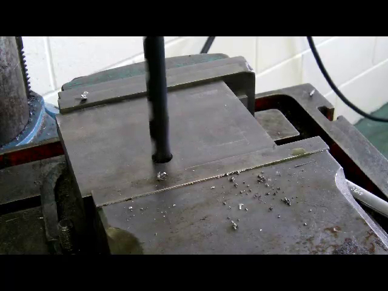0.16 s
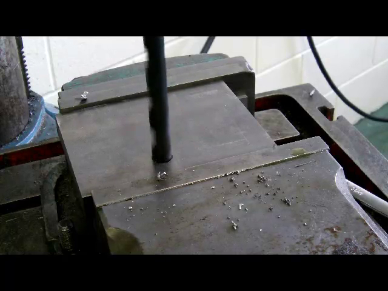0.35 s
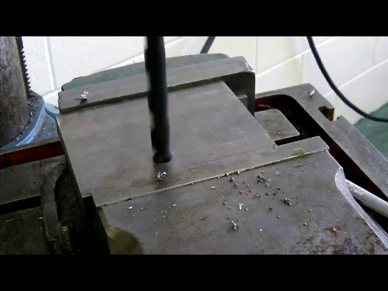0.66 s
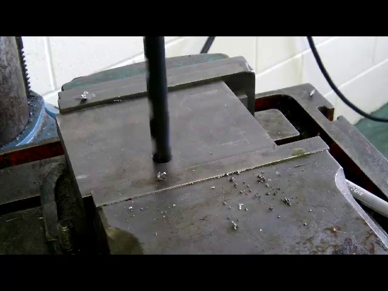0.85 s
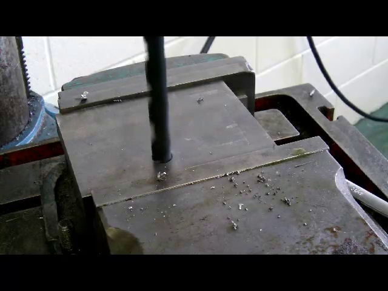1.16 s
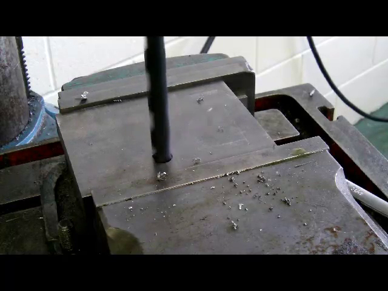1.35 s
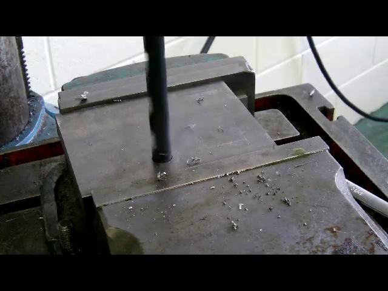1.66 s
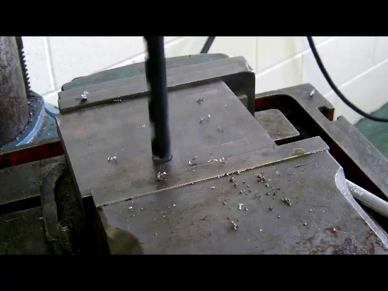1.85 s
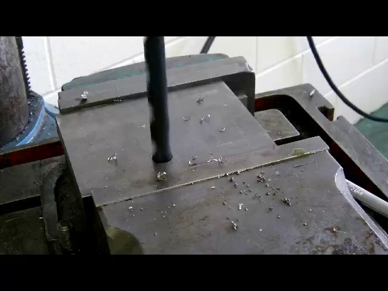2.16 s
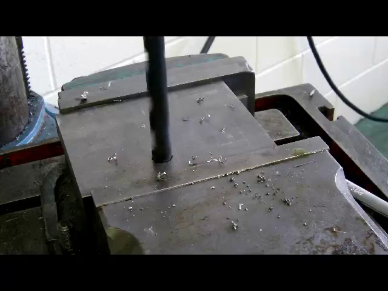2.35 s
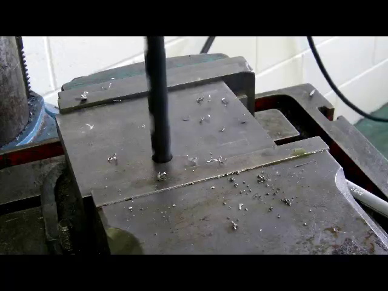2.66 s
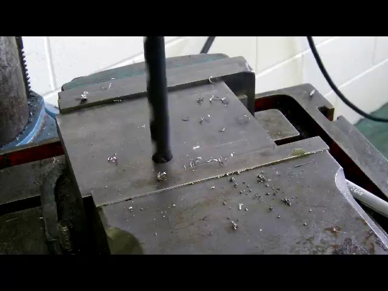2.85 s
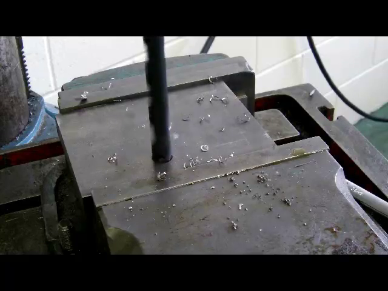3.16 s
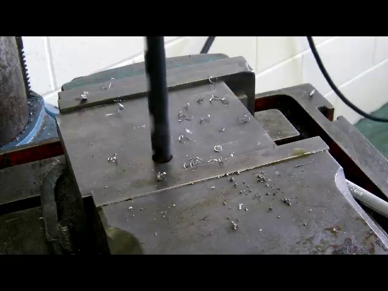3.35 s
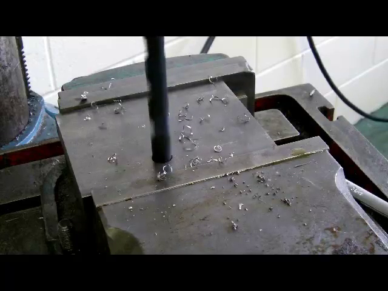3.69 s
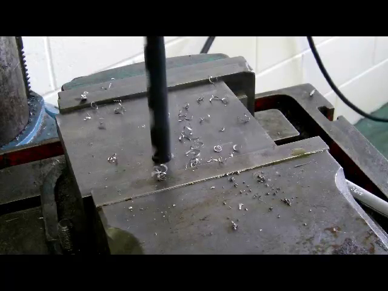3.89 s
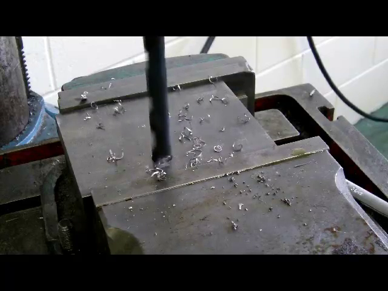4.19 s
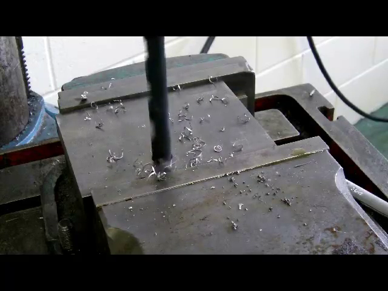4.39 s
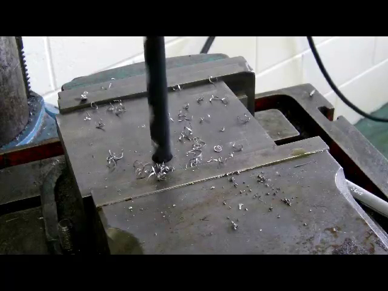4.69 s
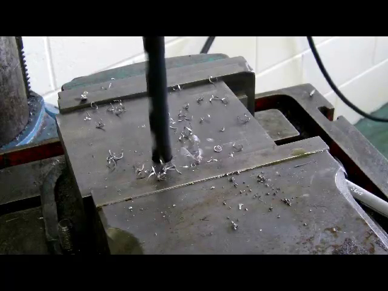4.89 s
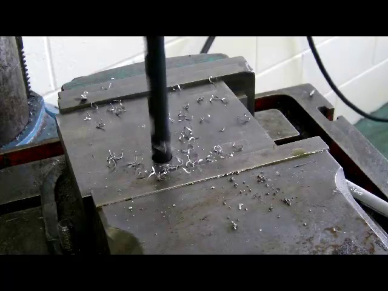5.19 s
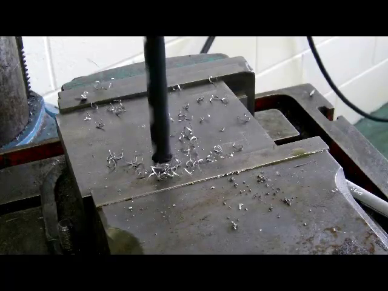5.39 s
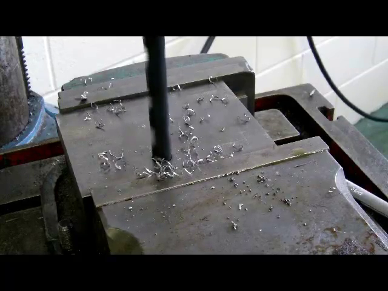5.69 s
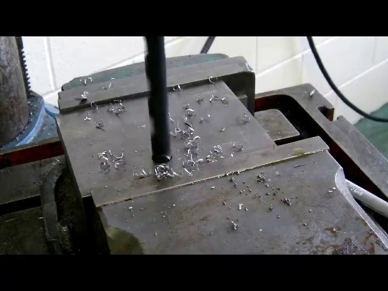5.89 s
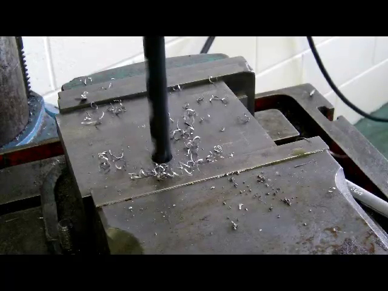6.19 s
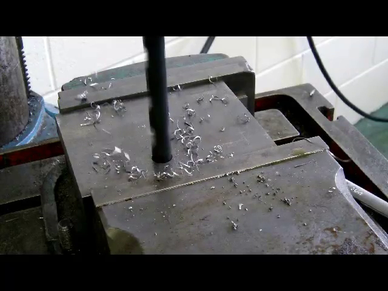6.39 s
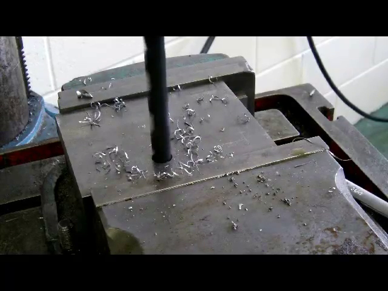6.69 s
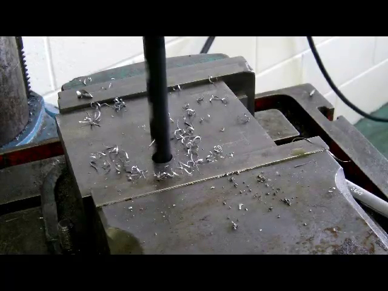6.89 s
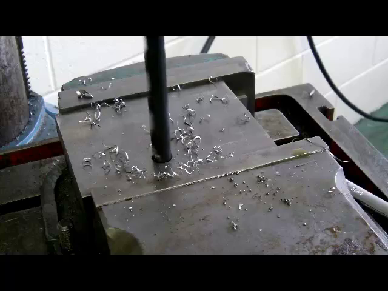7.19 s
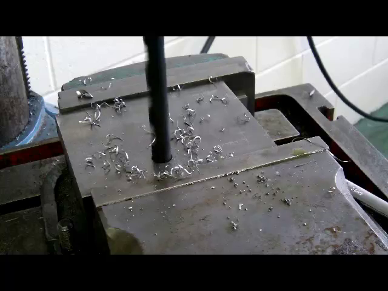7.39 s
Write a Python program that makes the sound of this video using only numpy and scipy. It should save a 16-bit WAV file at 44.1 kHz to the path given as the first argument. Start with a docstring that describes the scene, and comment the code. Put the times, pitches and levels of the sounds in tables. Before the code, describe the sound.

Heard close in a small hard-walled workshop, a drill press hums and rattles. The bit bites into steel with a harsh, crackling crunch and bright hiss, digging in unevenly for several seconds. The cut then evens out, chips tick onto the plate, and the flutes chirp rapidly with small squeaks. One sharp squeak and click near the end is followed by quieter motor whine.

```python
"""Workshop: a drill press bores a steel plate, heard close up. The drive is a set of spindle-locked tones and
a rattle that partly repeats each turn; its pitch sags under the feed. The two lips dig in and snap off chips, made
as shaped noise and ringing modes, then cut more evenly while the flutes rub and chirp in the hole as narrow noise.
The bit sticks and squeaks in brief tones, once sharply with a click. Chips land, walls echo, and a low rumble
of shaped noise follows the steady chip hiss."""
import sys
import numpy as np
from scipy import signal
from scipy.fft import rfft, irfft, next_fast_len
from scipy.io import wavfile
from scipy.ndimage import uniform_filter1d, map_coordinates

SR = 44100
rng = np.random.default_rng(int(sys.argv[2]) if len(sys.argv) > 2 else 0)


def wav_out(sig):
    """Save sig, one row per channel (or a flat mono array), as 16-bit PCM at SR to the path in sys.argv[1]."""
    wavfile.write(sys.argv[1], SR, np.round(np.clip(np.atleast_2d(sig).T, -1, 1) * 32767).astype(np.int16))


N = 332734
TOP_HZ = 11050  # upper band limit

# Feed pressure. Each row: time in seconds, pressure 0-1.
FEED = [(0, 0.04), (.35, 0.02), (1, 0.3), (2.3, .47), (3, 0.64), (4.3, 1), (6.3, 0.91), (6.5, 0.03),
        (7.54, 0.04)]
# Drive tones. Each row: cycles per spindle turn (rounded when used), level in dB against the whine level,
# gain in dB at full feed.
DRIVE_TONES = [(34, -13.5, 4.5), (38, -39, 8), (45, -23.5, -2.5), (52, -17, 8), (54, -13, -6),
               (70.07, -16.5, 0), (71.36, -7, -7.5), (74.52, 2, 0.5), (81.9, -17, -17), (85.8, -11, -5),
               (88.6, -9, -6), (117, -3.5, -19), (119.6, -11, -9), (119.7, -14, -6), (126.1, -18, -4),
               (135.8, -12, 1), (167.2, -15, 2.5), (176, -20, 2.5), (195, -31, -4), (232.8, -11.5, -1)]
# Spectrum of the drive housing. Each row: frequency in Hz, relative density in dB per Hz.
HOUSING = [(150, -22.5), (215, -16), (290, -5), (350, -12), (430, -11.5), (540, 2.5), (630, -6.5),
           (760, 5.5), (1050, 0.5), (1300, 4.5), (2250, -1), (2800, -12), (6500, -22), (11000, -40)]
# Ringing of guard and head. Each row: frequency in Hz, width in Hz, relative level in dB.
GUARD_MODES = [(346.8, 13.4, 11), (532, 8.5, 7), (750, 20, 4), (860, 69, 0.5), (1173, 7.3, 7.5),
               (1353, 50, 12.5), (1640, 37, -23), (2290, 7, 4)]
# Steady cut: point enters, lips settle in, feed is eased. Each row: time in seconds, grinding level in dB,
# chip hiss level in dB, both before digs, lulls and trims.
CUT = [(0, -59, -72), (.24, -42, -50), (.35, -29.5, -37.5), (.6, -30, -30), (.68, -26.5, -27),
       (.9, -24.5, -20.5), (1.24, -23.5, -20.5), (1.52, -25, -29.5), (2.15, -26.5, -30), (2.7, -28.5, -31),
       (3.75, -31.5, -28), (4.9, -32, -34.5), (6.33, -33, -36), (6.52, -41.5, -47), (6.9, -41.5, -50),
       (7.42, -40, -49), (7.54, -38, -33.5)]
# The bit digs in. Each row: start in seconds, length in seconds, grinding gain in dB, hiss gain in dB.
DIGS = [(1.08, 0.34, 3.5, 2), (1.58, .095, 4, 2.5), (1.692, 0.38, 7.5, 9), (2.13, .045, 3, 5),
        (2.255, 0.24, 10.5, 10), (2.789, 0.18, 7, 5.5), (3.27, 0.12, 4.5, 2.5)]
# Wandering spot where the lips bite hardest. Each row: time in seconds, lag in half turns.
BITE_LAG = [(.25, 1.5), (.55, 1.08), (.9, 1.06), (1.22, .9), (1.48, .56), (1.72, .78), (1.92, .3),
            (2.3, .3), (2.55, .52), (2.95, 1.05), (3.45, 1.2), (3.7, .97)]
# Spectrum of grinding. Each row: frequency in Hz, relative density in dB per Hz.
GRIND = [(200, -49), (450, -35), (700, -7), (1100, -7.5), (1700, -8.5), (2500, -4.5), (3600, -1.5),
         (5000, -3.5), (7000, -5.5), (10000, -12.5)]
# Spectrum of tearing chips. Each row: frequency in Hz, relative density in dB per Hz.
CHIP = [(100, -22), (300, -17), (700, -17), (2000, -10.5), (4500, -7), (6500, -1.5), (8000, -1.5),
        (9500, -1), (11000, -11.5)]
# Modes of plate, vice and bit. Each row: frequency in Hz, width in Hz, relative level in dB.
STEEL_MODES = [(840, 105, 2.5), (947, 50, 4.5), (1425, 100, 0), (1670, 35, 5), (1782, 60, 3), (2142, 69, 1),
               (2390, 81, 3.5), (2690, 61, 2.5), (3142, 154, 3), (3830, 110, -2), (4123, 126, 0),
               (4790, 66, -2.5), (6300, 146, -2), (7740, 110, 0), (9430, 110, -2)]
# Loudest chips breaking. Each row: start in seconds, level in dB, hold in seconds.
SNAPS = [(0.28, -14.5, 0.0014), (0.3705, -11, 0.00067), (.5025, -12.5, .0016), (0.545, -16.5, .0025),
         (.556, -16.5, .0023), (.573, -14, .001), (.645, -13, 0.0068), (0.676, -10, .001),
         (0.741, -13, 0.0015), (.808, -14.5, .008), (0.833, -7.5, .0018), (0.857, -12, 0.0051),
         (.901, -10.5, 0.0055), (0.928, -10, .0014), (.952, -9.5, 0.0062), (0.975, -16, 0.0018),
         (1.022, -9, 0.0022), (1.035, -12, 0.015), (1.136, -12, 0.011), (1.188, -12, 0.014),
         (1.696, -15, 0.02), (1.751, -13, 0.012), (1.819, -10, .002), (1.922, -18, 0.0069),
         (2.074, -13, 0.0034), (2.128, -9.5, 0.0011), (2.284, -8.5, .004), (2.33, -13, .003),
         (2.36, -10, 0.005), (2.484, -11, 0.0064), (2.531, -12, .007), (2.638, -13.5, .004),
         (2.74, -10.5, 0.0021), (2.748, -11.5, 0.01), (2.785, -12, .0025), (2.804, -14.5, 0.02),
         (2.85, -13, 0.0041), (2.922, -13, 0.015), (2.97, -12.5, .003), (3.001, -11.5, 0.0059),
         (3.023, -13, .003), (3.108, -14, 0.0036), (3.169, -11, 0.0027), (3.279, -10.5, 0.0068),
         (3.296, -14, .002), (3.31, -15.5, .004), (3.356, -13.5, 0.021), (3.485, -17.5, .01),
         (3.529, -14.5, .0012), (3.622, -14.5, .001), (3.66, -14, .0028), (3.716, -11.5, .0016),
         (3.763, -11, .0015), (3.772, -15, 0.022), (3.838, -11.5, 0.004), (4.023, -18, 0.0068),
         (4.112, -12.5, 0.0037), (4.244, -15, 0.0031), (4.364, -14, .0015), (4.576, -14, 0.0022),
         (4.768, -15, .004), (4.9057, -11.5, 0.0025), (5.192, -16.5, 0.0027), (5.892, -15, .0006),
         (6.3655, -14, 0.0022), (6.478, -14, 0.0015), (6.82, -21, 0.0011)]
# Chips landing on the plate. Each row: start in seconds, ring level in dB.
LANDINGS = [(3.602, -23), (3.762, -34), (3.785, -23), (4.024, -22), (4.104, -24), (4.17, -26),
            (4.301, -21.5), (4.545, -26), (4.632, -20), (4.768, -28), (4.907, -20), (5.04, -30),
            (5.192, -22), (5.378, -29)]
# Flutes rubbing in the hole. Each row: time in seconds, centre pitch in Hz, level in dB before the trim.
RUB = [(2.8, 7670, -50), (3.7, 7770, -37), (4.45, 8120, -27.5), (4.95, 7815, -25), (5.25, 7160, -28),
       (5.7, 6686, -24), (6.35, 6560, -26), (6.6, 6320, -37), (6.95, 6244, -43), (7.22, 6800, -35.5),
       (7.42, 8555, -48)]
# The bit sticks and slips. Each row: start in seconds, level in dB, hold in seconds, settled pitch in Hz,
# roughness 0-1.
SQUEAKS = [(5.048, -24.5, .015, 6250, .6), (5.296, -18.5, .006, 6400, .7), (5.332, -7, 0.0046, 6180, 0.36),
           (5.586, -16, .0015, 6460, .9), (5.61, -16, .004, 6390, .7), (5.667, -15.5, 0.014, 6480, 0.7),
           (6.003, -17.5, .0015, 6600, .8), (6.196, -20, .006, 6630, .8), (6.238, -15, 0.0025, 6660, .7),
           (6.3644, 5, 0.015, 8030, 0.37), (6.387, -7.5, 0.012, 6070, 0.77),
           (6.391, -10, 0.0043, 9430, 0.7), (6.463, -24, 0.01, 7300, 1), (6.479, -6.5, 0.0027, 5610, 0.8),
           (6.4792, -8.5, 0.0014, 9900, 0.9), (6.658, -27, .006, 6400, 0.93), (7.092, -33, 0.03, 6300, .9),
           (7.204, -28, .018, 6900, 1)]
# The work jolts in the vice. Each row: start in seconds, level in dB, hold in seconds.
JOLTS = [(1.7, -47, .03), (1.77, -49, .025), (2.738, -44, 0.025), (3.28, -41, .022), (5.993, -45, .015),
         (6.358, -31, 0.036), (6.472, -40, 0.012)]
# Spectrum of rumble and thumps. Each row: frequency in Hz, relative density in dB per Hz.
RUMBLE = [(20, 2), (50, -2), (90, -6.5), (130, -2), (180, -6), (300, -14), (800, -36.5)]
# Echo decay of the walls. Each row: frequency in Hz, 60 dB decay time in seconds.
WALLS = [(200, 0.19), (2000, 0.22), (10000, 0.12)]

WHINE_ORDER = 75  # whine cycles per spindle turn
IDLE_HZ, SAG_HZ = 746.5, 2.6  # free-running whine; its drop at full feed
IDLE_DB, LOADED_DB = -33.5, -26.5  # whine level, free and loaded
SEATED_FEED = 0.13  # feed that takes up the play
RATTLE_DB, SHAKEN_DB = -28, -4.5  # drive's own rattle; rattle from the cut, against the steady grinding level
DIG_ATTACK_S, DIG_RELEASE_S = 0.01, 0.023
LULL_DB, LULL_S = -1.5, 0.038  # hiss sinks while a big chip curls, just before it breaks
# Small chips: chance per lip pass, share of it removed at full feed, level over untrimmed hiss, typical hold.
BREAK_CHANCE, BREAK_CALM, BREAK_DB, BREAK_S = 0.8, 0.68, 5, 0.0032
RUB_FADE_DB_PER_S = 30  # fade-in as the flutes first reach the wall
CHIRPS_PER_S, CHIRP_AT_S = 21.28, 6.15  # pace of rubbing strokes; middle of one
STROKE_DB, STROKE_SCATTER_DB = 4.5, 1.8  # swell of each stroke; slow scatter in level
OVERSHOOT, SETTLE_S = 0.2, 0.0015  # squeak starts sharp by this share of its pitch; settling time


def amp(db):
    """Decibels to gain."""
    return 10 ** (np.asarray(db) / 20)


def unit(x):
    """Scale to rms 1."""
    return x / np.sqrt(np.mean(x ** 2) + 1e-20)


def along(points, hz):
    """Interpolate (Hz, value) points on a log frequency axis."""
    f, v = np.transpose(points)
    return np.interp(np.log(hz + 1), np.log(f), v)


def curves(rows):
    """One value per sample for each column after the time."""
    s, *cols = np.transpose(rows)
    return [np.interp(np.arange(N) / SR, s, c) for c in cols]


def wobble(rate_hz):
    """Smooth random curve, rate_hz knots a second."""
    knots = rng.standard_normal(int(N * rate_hz / SR) + 4)
    return map_coordinates(knots, [np.arange(N) * rate_hz / SR])


def filtered(x, response):
    """Apply a frequency response scaled to keep the power of white noise."""
    m = next_fast_len(N + SR // 2)
    h = response(np.fft.rfftfreq(m, 1 / SR))
    h = h / np.sqrt(np.mean(np.abs(h) ** 2))
    return irfft(rfft(x, m) * h, m)[..., :N]


def coloured(x, spectrum):
    """Shape x by (Hz, dB) points, closed above TOP_HZ."""
    return filtered(x, lambda hz: amp(along(spectrum, hz)) * (hz < TOP_HZ))


def ringing(x, modes):
    """Pass x through parallel resonances of alternating sign."""
    def response(f):
        total = 0
        for k, (centre_hz, width_hz, db) in enumerate(modes):
            damping = 1j * f * width_hz
            total = total + (-1) ** k * amp(db) * damping / (centre_hz ** 2 - f * f + damping)
        return total
    return filtered(x, response)


def burst(t, hold_s, rise_s, t60_s):
    """Envelope that rises, holds and dies away."""
    return (1 - np.exp(-t / rise_s)) * amp(-60 * np.maximum(t - hold_s, 0) / t60_s)


def impulses(per_s, scatter_db):
    """Single ticks at random moments and of uneven size; rms 1."""
    luck, size = rng.random(N), rng.standard_normal(N)
    return unit((luck < per_s / SR) * amp(scatter_db * np.clip(size, -2, 1.5)))


def friction(pitch_hz, width_hz):
    """A randomly driven ring: narrow noise around a steady or moving pitch; rms 1."""
    sos = signal.butter(2, width_hz / 2, fs=SR, output="sos")
    jitter = signal.sosfilt(sos, rng.standard_normal((2, len(pitch_hz))))
    phase = 2 * np.pi * np.cumsum(pitch_hz) / SR
    return unit(jitter[0] * np.cos(phase) + jitter[1] * np.sin(phase))


def patchy(x, depth_db, size=512):
    """Give x short-lived louder and softer patches, a few hundred Hz wide."""
    z = signal.stft(x, nperseg=size)[2]
    field = uniform_filter1d(rng.standard_normal(z.shape), size=3, axis=0)
    field = unit(uniform_filter1d(field, size=4, axis=1))
    return signal.istft(z * unit(amp(depth_db * field)), nperseg=size)[1][:N]


def drive(turns, whine_db, repeat_share=0.44, repeat_hz=650, guard_db=-5, dip_db=-6, waver_db=0.2,
          unsteady=0.19, sing_db=-36):
    """The drive's surfaces meet the same way at every turn: tones and a partly looping rattle."""
    size = 16384
    pattern = unit(signal.resample(rng.standard_normal(size=4096), size))
    looped = np.interp(turns % 1, np.arange(size) / size, pattern)
    # only the fine rattle repeats; the low drone does not
    looped = signal.sosfilt(signal.butter(4, repeat_hz, "high", fs=SR, output="sos"), looped)
    force = np.sqrt(repeat_share) * looped + np.sqrt(1 - repeat_share) * rng.standard_normal(N)
    housing = unit(coloured(force, HOUSING))
    guard = unit(ringing(force, GUARD_MODES))
    rattle = unit(housing + amp(guard_db) * guard)

    feed, tones = curves(FEED)[0], np.zeros(N)
    for order, db, load_db in DRIVE_TONES:
        phase = 2 * np.pi * (round(order) * turns + rng.random()) + 0.1 * wobble(8)
        # weaker tones swell and fade more
        drift_db = waver_db * wobble(12) + unsteady * db * wobble(5)
        tones += amp(db + feed * load_db + drift_db) * np.sin(phase)
    # load slackens briefly once a turn
    slack = np.exp(5 * (np.cos(2 * np.pi * turns) - 1))
    # loose guard sings while the spindle runs free; the feed damps it
    singing = amp(sing_db + 3.3 * wobble(8) - 10 * feed) * friction(np.full(N, 1165), width_hz=22.4)
    # the cut shakes the housing
    rattle_level = np.hypot(amp(RATTLE_DB), amp(SHAKEN_DB + curves(CUT)[0]))
    return singing + rattle_level * rattle + amp(whine_db + dip_db * slack) * tones


def lip_pass(turns):
    """Count lip passes, two per turn: a whole number at each hardest bite."""
    return 2 * turns - curves(BITE_LAG)[0]


def cut_levels():
    """Grinding and hiss in dB: steady cut, raised by digs, easing before a big chip breaks."""
    grind_db, hiss_db = curves(CUT)
    t = np.arange(N) / SR
    for s, length_s, more_grind_db, more_hiss_db in DIGS:
        rise = 1 - np.exp(-np.maximum(t - s, 0) / DIG_ATTACK_S)
        depth = rise * np.exp(-np.maximum(t - s - length_s, 0) / DIG_RELEASE_S)
        grind_db = grind_db + more_grind_db * depth
        hiss_db = hiss_db + more_hiss_db * depth
    breaks = np.append(np.sort([row[0] for row in SNAPS]), np.inf)
    wait_s = breaks[np.searchsorted(breaks, t)] - t
    lull_db = LULL_DB * np.exp(-wait_s / LULL_S)
    return grind_db + lull_db / 2, hiss_db + lull_db


def swarf(count=3200, pitch_hz=2900, spread=0.5, scatter_db=3.0):
    """Curls of swarf tick dryly, each at its own pitch; rms 1."""
    t, out = np.arange(SR // 32) / SR, np.zeros(N + SR)
    tick = burst(t, 0, rise_s=0.0003, t60_s=0.02)
    starts = rng.integers(0, N, count)
    for at, (pitch, loudness) in zip(starts, rng.standard_normal((count, 2))):
        hz = pitch_hz * np.exp(spread * pitch)
        if hz < TOP_HZ:
            out[at:at + len(t)] += amp(scatter_db * loudness) * tick * np.sin(2 * np.pi * hz * t)
    return unit(out[:N])


def cutting(turns, lip_db=3.5, uneven_db=2.0, calm=0.58, splinters_per_s=110, splinter_db=-9,
            splinter_scatter_db=4, grain_db=3.5, tear_db=4.0, run_db=3.5, shift_db=2.5, wander=0.012,
            grind_db=-1, ring_db=-2, swarf_db=-3, hiss_db=2, chatter=0.13, chatter_from_db=-33.5):
    """Each of the two lips tears the steel in tiny fractures that shake the plate."""
    grind_level_db, hiss_level_db = cut_levels()
    # the bite evens out under firm feed
    evening = 1 - calm * curves(FEED)[0]
    bite_db = (lip_db * np.cos(2 * np.pi * lip_pass(turns)) + uneven_db * wobble(60)) * evening
    fractures = unit(rng.standard_normal(N) * amp(grain_db * wobble(900)))
    # the chip's edge tears in sharper cracks, in short runs
    crack_db = (tear_db * wobble(1100) + run_db * wobble(220)) * evening
    tearing = unit(rng.standard_normal(N) * amp(crack_db))
    # splinters fly off with single ticks
    tearing = unit(tearing + amp(splinter_db) * impulses(splinters_per_s, splinter_scatter_db))
    # as the contact moves round the hole, different modes lead and drift a little
    modes = np.zeros(N)
    for hz, width_hz, db in STEEL_MODES:
        level = amp(db + shift_db * wobble(28)) * np.sqrt(width_hz)
        modes += level * friction(hz * (1 + wander * wobble(7)), width_hz)
    # a heavy cut feeds the modes back, so they grow faster than the grinding
    mode_db = ring_db + chatter * (grind_level_db - chatter_from_db)
    body = amp(grind_db) * coloured(fractures, GRIND) + amp(mode_db) * unit(modes) + amp(swarf_db) * swarf()
    hiss = coloured(amp(hiss_level_db + hiss_db + bite_db) * tearing, CHIP)
    return amp(grind_level_db + 0.58 * bite_db) * body + hiss


def small_snaps(turns, scatter_db=2.0, length_spread=0.42, stray=0.2):
    """Any lip bite may break a chip, less often under firm feed: rows (s, level dB, hold s)."""
    lips = lip_pass(turns)
    passes = np.arange(int(lips[-1]) - 1)
    luck = rng.random(len(passes))
    place, loudness, stretch = rng.standard_normal((len(passes), 3)).T
    at = np.minimum(np.searchsorted(lips, passes + stray * place), N - 1)
    level_db = cut_levels()[1][at] + BREAK_DB + scatter_db * loudness
    rows = np.column_stack([at / SR, level_db, BREAK_S * np.exp(length_spread * stretch)])
    return rows[luck < BREAK_CHANCE * (1 - BREAK_CALM * curves(FEED)[0][at])]


def chips(turns, crackle_db=3.5, ring_db=-12, colour_db=2.5):
    """A chip breaks in a short run of cracks of its own colour; plate and bit ring after it."""
    size = 4096
    snaps, t = np.zeros(N + SR), np.arange(size) / SR
    cracks = coloured(rng.standard_normal(N) * amp(crackle_db * wobble(700)), CHIP)
    for s, db, hold_s in [*SNAPS, *small_snaps(turns)]:
        at = round(s * SR)
        colour = amp(colour_db * signal.resample(rng.standard_normal(size=36), size // 2 + 1))
        shape = burst(t, hold_s, rise_s=0.0001, t60_s=0.007)
        snap = shape * irfft(rfft(cracks[at:at + size], size) * colour)
        snaps[at:at + size] += amp(db) * snap * np.linalg.norm(shape) / np.linalg.norm(snap)
    return snaps[:N] + amp(ring_db) * ringing(snaps[:N], STEEL_MODES)


def flutes(uneven_db=2.5, rub_db=-1.0, glide_hz=120, swing_hz=200, bit_db=-7, slips_per_s=170,
           slip_db=-5.0, slip_scatter_db=4, slip_t60_s=0.0078):
    """The flutes chirp on the hole wall about twice a turn, in tiny slips, and make the bit sing."""
    pitch_hz, level_db = curves(RUB)
    t = np.arange(N) / SR
    level_db = level_db - RUB_FADE_DB_PER_S * np.maximum(RUB[0][0] - t, 0)
    stroke = 2 * np.pi * CHIRPS_PER_S * (t - CHIRP_AT_S)
    slip_decay = amp(-60 * t[:SR // 50] / slip_t60_s)
    slips = unit(signal.fftconvolve(impulses(slips_per_s, slip_scatter_db), slip_decay)[:N])
    swell = amp(STROKE_DB * np.cos(stroke) + STROKE_SCATTER_DB * wobble(18))
    grip = unit(amp(uneven_db * wobble(420))) + amp(slip_db) * slips
    pressure = unit(swell * grip)
    # each chirp slides down as its flute passes
    scrape = friction(pitch_hz - glide_hz * np.sin(stroke) + swing_hz * wobble(120), width_hz=820)
    singing = friction(np.full(N, 6300), width_hz=640)
    return amp(level_db + rub_db) * pressure * (scrape + amp(bit_db) * singing)


def squeaks():
    """When the bit catches, the rubbing locks into a brief tone that starts sharp and settles."""
    out, t = np.zeros(N + SR), np.arange(SR // 10) / SR
    for s, db, hold_s, hz, rough in SQUEAKS:
        pitch_hz = hz * (1 + OVERSHOOT * np.exp(-t / SETTLE_S))
        tone = np.sqrt(2 * (1 - rough ** 2)) * np.sin(2 * np.pi * np.cumsum(pitch_hz) / SR)
        voice = tone + rough * friction(pitch_hz, width_hz=1100)
        at = round(s * SR)
        out[at:at + len(t)] += amp(db) * burst(t, hold_s, rise_s=0.00087, t60_s=0.022) * voice
    return out[:N]


def landings(pitch_hz=3150, width_hz=380, t60_s=0.049, tick_db=1, tick_t60_s=0.02):
    """A flung chip drops on the plate with a dry tick and rings its main mode."""
    t = np.arange(N) / SR
    rings, ticks = np.zeros(N), np.zeros(N)
    for s, db in LANDINGS:
        since_s = np.maximum(t - s, 0)
        rings += amp(db) * burst(since_s, 0.0014, rise_s=0.00056, t60_s=t60_s)
        ticks += amp(db) * burst(since_s, 0.0011, rise_s=0.0001, t60_s=tick_t60_s)
    dry_ticks = ticks * coloured(rng.standard_normal(N), GRIND)
    return rings * friction(np.full(N, pitch_hz), width_hz) + amp(tick_db) * dry_ticks


def rumble(floor_db=-60.5, follow_db=-27, lumpy_db=2.5, dip_db=4.0, side_db=-3):
    """A low, uneven rumble rises and falls with the steady chip hiss, with thumps at the jolts; stereo."""
    hiss_db, t = curves(CUT)[1], np.arange(N) / SR
    level = np.hypot(amp(floor_db), amp(follow_db + hiss_db)) * amp(lumpy_db * wobble(15))
    # the low rumble level drops briefly at random moments
    level = level * amp(-dip_db * np.maximum(wobble(14), 0) ** 2)
    thumps = np.zeros(N)
    for s, db, hold_s in JOLTS:
        thumps += amp(db) * burst(np.maximum(t - s, 0), hold_s, rise_s=0.0024, t60_s=0.046)
    mid, side = coloured(rng.standard_normal((2, N)), RUMBLE)
    side = amp(side_db) * side
    return (level + thumps) * np.array([mid + side, mid - side])


def workshop(x):
    """The walls answer 5 ms late with a noise tail; each frequency dies at its own speed."""
    hz, t, z = signal.stft(rng.standard_normal(SR // 2), SR, nperseg=256)
    decay = amp(-60 * t / along(WALLS, hz)[:, None])
    tail = signal.istft(z * decay, SR, nperseg=256)[1]
    return signal.fftconvolve(np.pad(x, (SR // 200, 0)), tail / np.linalg.norm(tail))[:N]


def scene(echo_db=-24, cut_patches_db=2.5, rub_patches_db=3.0, lowest_hz=205):
    """Feed slows the spindle and loads the drive; the turning paces drive and cut; press is in the middle."""
    feed = curves(FEED)[0]
    turns = np.cumsum((IDLE_HZ - SAG_HZ * feed) / WHINE_ORDER) / SR
    whine_db = IDLE_DB + (LOADED_DB - IDLE_DB) * np.tanh(feed / SEATED_FEED)
    press = drive(turns, whine_db)
    press = press + patchy(cutting(turns), cut_patches_db) + chips(turns)
    press = press + patchy(flutes(), rub_patches_db) + squeaks() + landings()
    # high-pass the press; the separate rumble layer fills the low end
    press = signal.sosfilt(signal.butter(6, lowest_hz, "high", fs=SR, output="sos"), press)
    return press + amp(echo_db) * workshop(press) + rumble()


def record(dry, ceiling=1.0, release_s=0.014):
    """A limiter ducks at loud peaks and recovers; then clipping and a steep low-pass."""
    over = np.log(np.maximum(np.abs(dry).max(axis=0) / ceiling, 1))
    fall = np.arange(N) / SR / release_s
    # peak hold of the log excess with exponential release
    held = np.exp(np.maximum.accumulate(np.log(over + 1e-9) + fall) - fall)
    limited = np.clip(dry * np.exp(-uniform_filter1d(held, size=64)), -1, 1)
    hz = np.fft.rfftfreq(N, 1 / SR)
    return irfft(rfft(limited) / np.sqrt(1 + (hz / TOP_HZ) ** 200), N)


dry = scene()
out = record(dry)
wav_out(out)
```